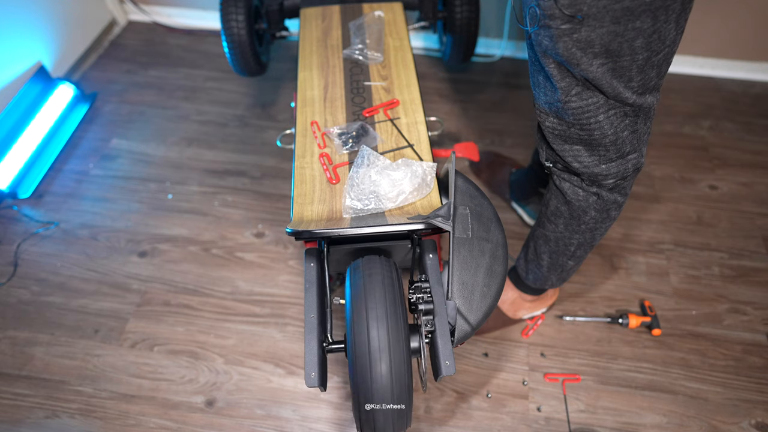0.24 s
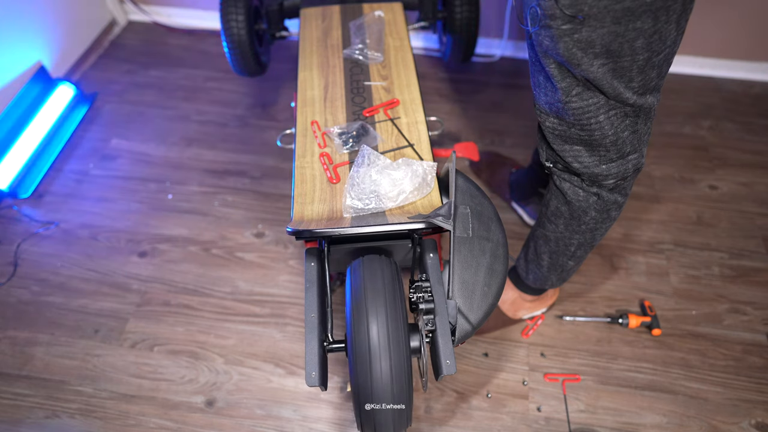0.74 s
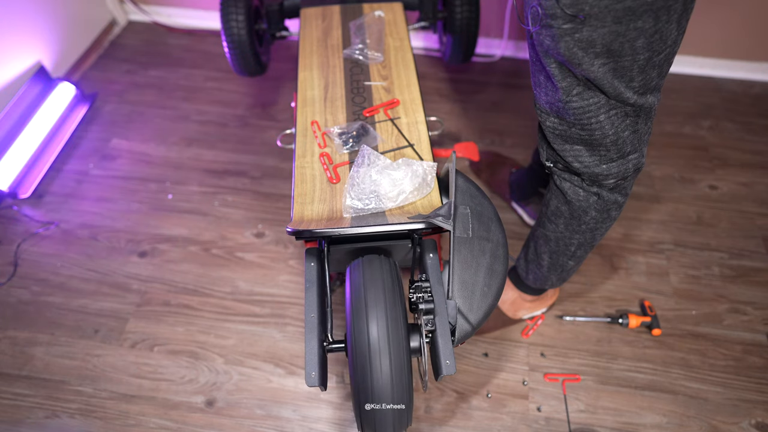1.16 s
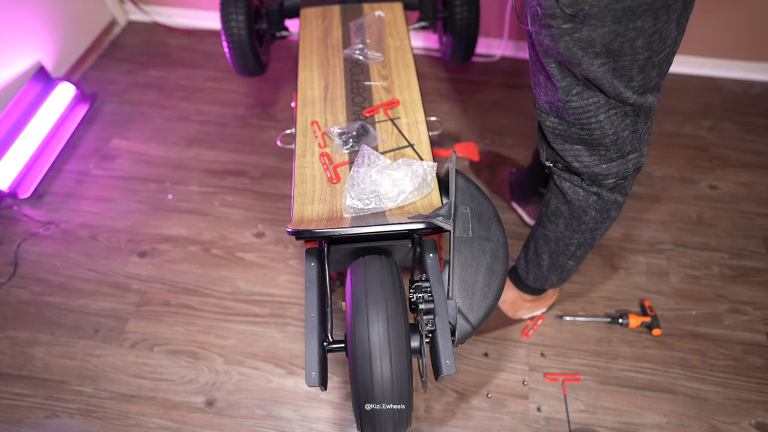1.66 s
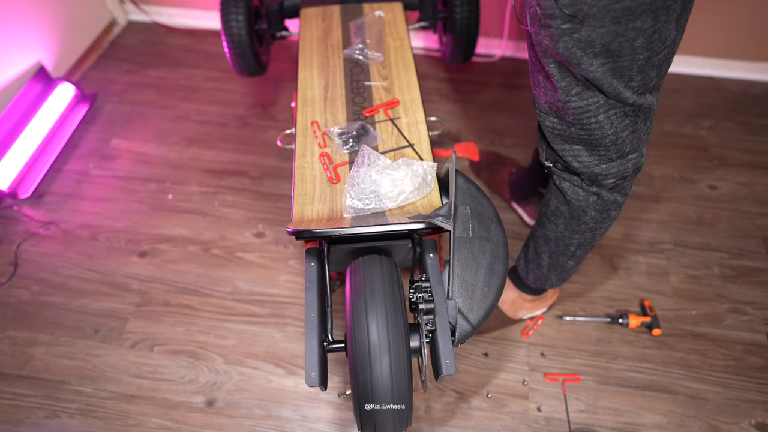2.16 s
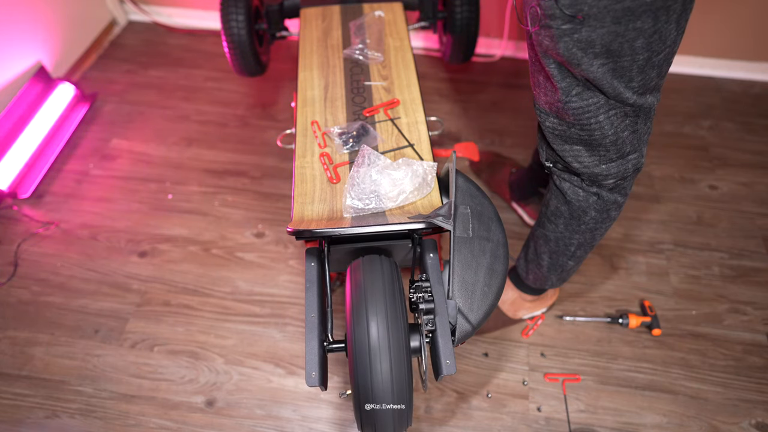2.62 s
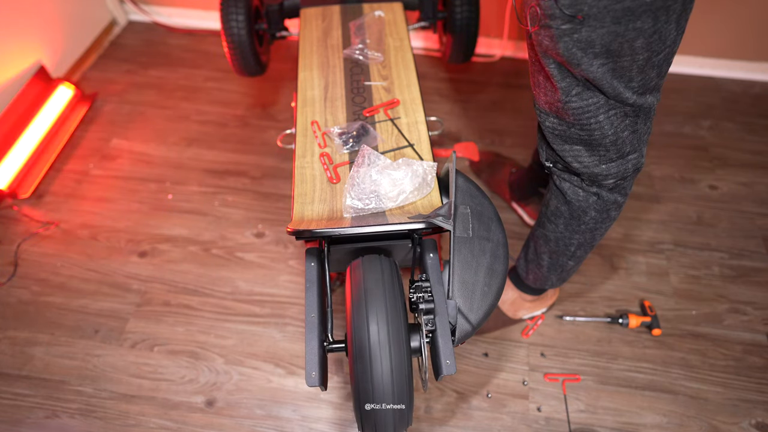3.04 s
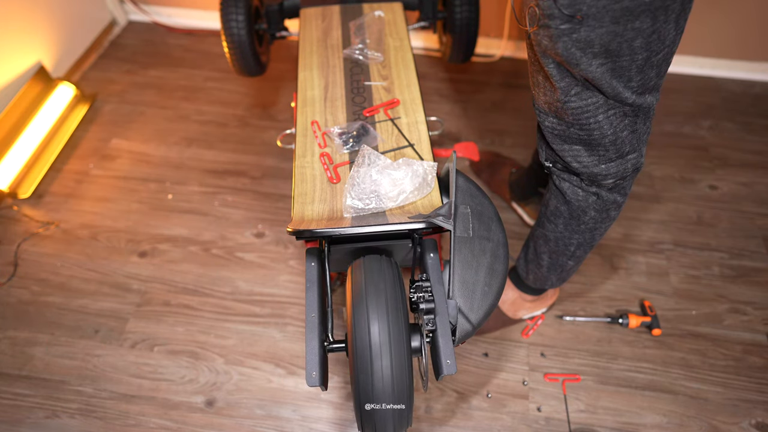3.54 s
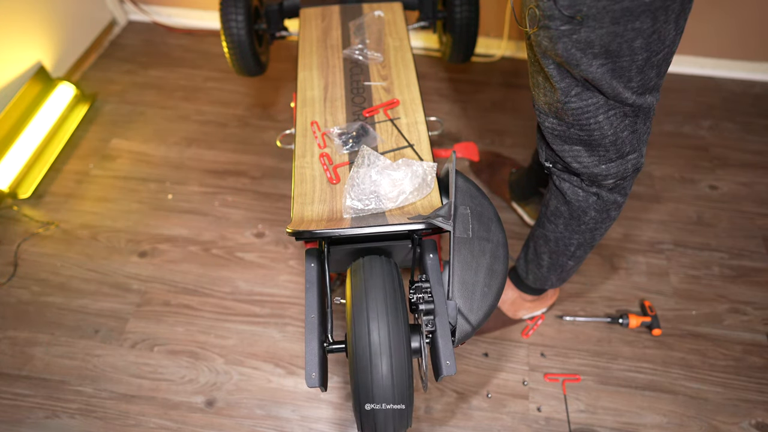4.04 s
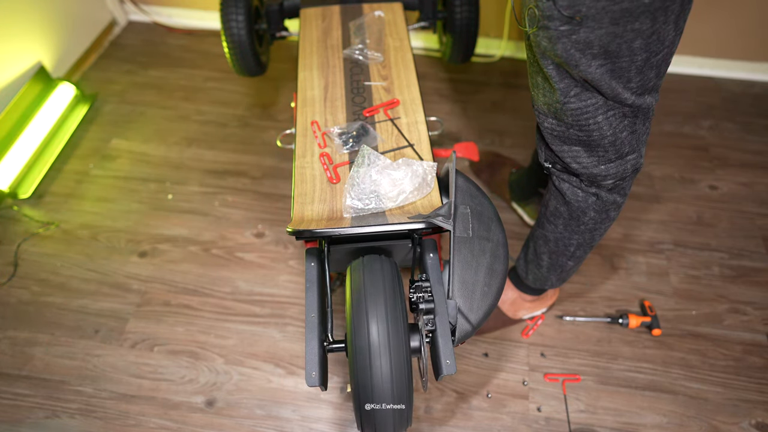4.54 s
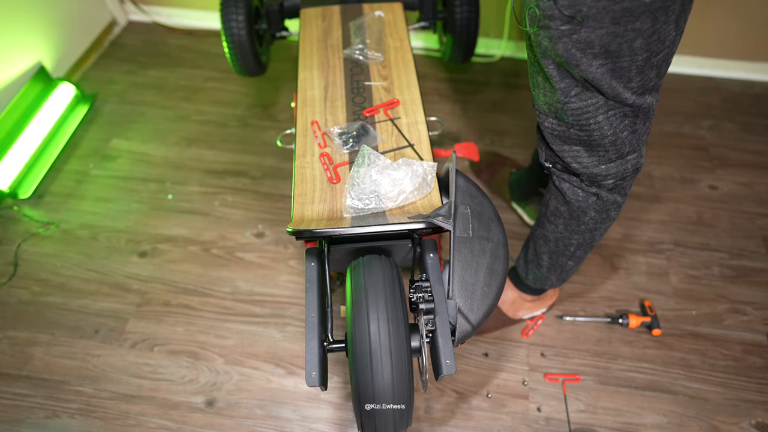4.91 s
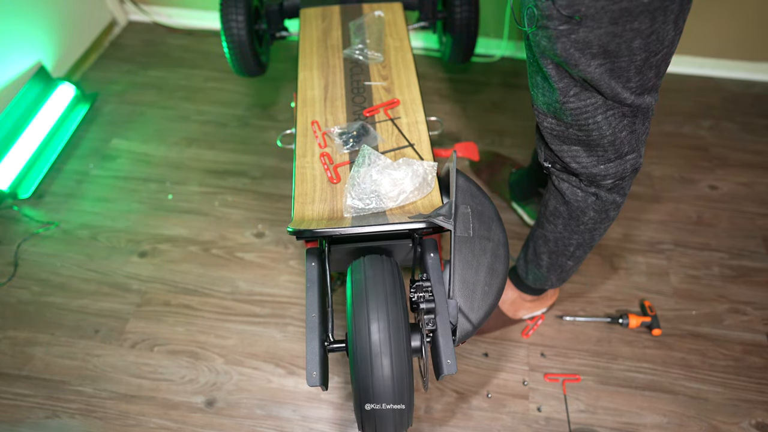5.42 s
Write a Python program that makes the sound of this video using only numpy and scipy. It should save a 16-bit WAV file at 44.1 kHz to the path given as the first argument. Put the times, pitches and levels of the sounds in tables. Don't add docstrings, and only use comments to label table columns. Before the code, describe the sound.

Close-up of a freewheeling scooter wheel droning loudly in a room, with brief gritty brake bites, lever knocks and recovering motor whine.

```python
import sys
import numpy as np
from scipy import signal
from scipy.fft import rfft, irfft, next_fast_len
from scipy.io import wavfile
from scipy.ndimage import uniform_filter1d

SR = 44100
rng = np.random.default_rng(int(sys.argv[2]) if len(sys.argv) > 2 else 0)


def convert_level_to_amplitude(level_db):
    exponent = np.asarray(level_db, float) / 20
    return 10 ** exponent


def digitize_waveform(pressure):
    field = np.atleast_2d(pressure).T
    bounded = np.clip(field, -1, 1)
    quanta = np.round(bounded * 32767).astype(np.int16)
    wavfile.write(sys.argv[1], SR, quanta)


N = 250488
TIME = np.arange(N) / SR
SIZE = next_fast_len(N + SR // 2)
FREQ = np.arange(SIZE // 2 + 1) * SR / SIZE + 1e-3

TURN_HZ, SWITCH_HZ = 14.88, 15745.5
BRAKE_PER_S, SPIN_UP_PER_S, CREEP = 3.9, 6.2, .03
CUT_S, LAG_S, WAKE_S = .035, 0.046, .035
PULL_DB, SURGE_DB, COAST_SLOPE = 1.7, 3, .9
WHIRR_DB, WHIRR_SLOPE = -1.23, .33
AIR_DB, AIR_SLOPE = -0.58, 0.18
SWELL_S, STRAIN_DB = .05, 1
BOOM_DB, BOOM_CUT_DB, BOOM_SLOPE = -15.5, -5.5, 0.15
GRIP_DB_PER_S, LET_GO_DB_PER_S = 1501, 203
RING_LEAD_S, RING_FADE_DB_PER_S = 0.018, 216

# brake on, brake off and throttle back, all in seconds.
STOPS = [
    (-.08, .1, .175),
    (3.63, 3.88, 3.958),
    (5.429, 5.69, 6.0),
]
# shaft order, line level in dB over the noise density at its pitch.
SHAFT_ORDERS = [(8, 11.0), (15, 14.0), (17, 15.0), (19, 17.0), (20, 13.0), (28, 22.0), (30, 25.0),
                (45, 21.0), (49, 14.0), (53, 14.0), (55, 11.0), (56, 11.0), (60, 24.0), (75, 20.0),
                (83, 13.0), (90, 13.0), (97, 18.0), (108, 12.0), (109, 23.0), (120, 16.0), (270, 19.0),
                (271, 17.0), (298, 18.0), (299, 17.0), (300, 20.0), (301, 14.0)]
# frequency in Hz,
# density in dB per Hz.
WHEEL_NOISE = [(175, -95), (215, -48.5), (245, -51), (285, -29), (325, -40), (345, -47), (385, -71.5), (430, -60),
               (480, -65), (565, -56), (650, -63.5), (740, -63.5), (800, -69.5), (990, -67.5),
               (1060, -69.5), (1270, -72), (1440, -70.5), (1550, -71), (1950, -73), (2300, -80.5), (3500, -83.5),
       (4500, -88), (6000, -90), (8500, -94.5), (9350, -99), (10400, -92), (12500, -97.5), (15700, -91.5)]
# frequency in Hz, width in Hz, level in dB over the
NOISE_PEAKS = [(750, 6.3, -14), (983, 10.4, -2.5), (1460, 14, 2), (1865, 20, 2.5), (2005, 7.8, 3),
               (2213, 26, 0.5), (2460, 19, 5), (3190, 14, -11), (5340, 15, -0.5), (6750, 12, -1), (7240, 32, 4),
               (7630, 39, 8), (8500, 32, 8.5), (8900, 25, 4.5), (10120, 23, 8), (11070, 17, -7), (11940, 30, 7),
               (12260, 50, 8), (12560, 30, 9), (13650, 25, 7), (14350, 40, 5)]
# centre in seconds, rise in dB over the rest level.
SWELLS = [(.26, 9), (.42, 5.5), (.54, 5), (0.661, 5.5), (.81, 5.5), (.99, 4.5), (1.121, 6), (1.3, 3),
          (1.68, 5), (2.05, 6), (2.15, 6), (2.3, 6), (2.548, 7.5), (2.74, 4.5), (2.89, 4.5), (3.261, 8),
          (3.49, 6.5), (3.6, 1.5), (4.06, 2), (4.17, 4.5), (4.28, 6), (4.42, -3.5), (4.541, 5), (4.75, 2.5),
          (4.87, 2.5), (5.0, 6.5), (5.19, 7), (5.299, 4.5), (5.39, 3), (5.52, 8.5), ]
# distance down in shaft orders, level in dB.
WHISTLES = [(111, -77), (105, -68), (99, -71), (90, -69), (60, -69), (58, -74), (55, -76), (54, -74),
            (30, -59), (24, -73), (7, -74), (6, -76), (3, -76), (0, -72)]
# start in seconds, hold in seconds, pad hiss in dB, disc ring in dB.
BITES = [
    (-.08, .08, -25, -26),
    (3.713, 0.06, -30.5, -34),
    (5.455, 0.082, -22, -28.5),
]
# frequency in Hz, density in dB per Hz.
PAD = [(300, -33), (600, 4), (1200, -7), (2200, -10.5), (2800, -13.5), (4500, -6), (6500, -5.5),
       (7700, -0.5), (8600, -4.5), (10400, -1.5), (12000, -8), (13700, -18), (15500, -35)]
# frequency in Hz, width in Hz, level in dB.
SQUEAL = [(3560, 24, -10), (6530, 34, -18), (7440, 26, -5.5), (8000, 36, -12), (8950, 73, -12),
          (10800, 36, -35)]
# frequency in Hz, width in Hz, level in dB.
DRAG = [(463, 26, 2), (574, 15, 4.5), (1005, 20, 5.5), (1067, 32, -4), (1308, 36, -7), (1660, 30, -6.5),
        (2187, 36, -10), (2470, 14, -13)]
# frequency in Hz, width in Hz, level in dB.
DISC = [(567, 28, -9), (1012, 38, 8.5), (1390, 43, 1.5), (1630, 38, -5), (1863, 33, -5.5), (2214, 70, -8.5),
        (3270, 50, -14), (3940, 54, -18.5)]
# start in seconds, then dull scrape, bright scrape, ring and thump in dB.
CLACKS = [
    (.004, -28, -45, -24, -26.5),
    (0.095, -25, -26, -24, -32),
    (.245, -23, -41, -39, -33),
    (.283, -21, -34.5, -37, -31),
    (3.653, -20, -44, -17.5, -26),
    (3.868, -28.5, -32.5, -31.5, -37),
    (3.954, -35, -43, -26, -37.5),
    (4.56, -20, -45, -48, -37),
    (5.423, -17, -38, -33.5, -40),
    (5.621, -44, -54, -46, -21.5),
]
# frequency in Hz, density in dB per Hz.
RUMBLE = [(20, -67), (27, -58.5), (35, -69), (60, -63.5), (80, -72), (90, -63.5), (100, -68), (108, -58.5),
          (125, -77), (148, -58), (175, -74), (200, -54.5)]
# frequency in Hz, left minus right in dB.
LEAN = [(60, 0.0), (110, -3.0), (200, -6.0), (380, -5.5), (700, -2.5), (1290, -0.5), (2380, -2.0),
        (4400, -1.0), (8120, -2.0), (15000, -1.5)]
# frequency in Hz, phase in radians by which the left leads.
LEAD = [(0, 0), (1120, 0.0), (1640, -0.4), (1890, -0.2), (4050, -0.1), (7240, -1.8), (7580, -1.4),
        (8180, -2.3), (10100, -3.5), (10900, -3.2), (14100, -5.0), (14500, -6.4), (14800, -10.4),
        (15300, -13.4)]
# frequency in Hz, share heard alike (1 same, 0 unrelated, negative opposed).
ALIKE = [(27, -0.34), (45, -0.072), (70, 0.26), (130, 0.79), (280, 1), (500, 0.93), (1000, 0.69),
         (2000, 0.7), (4000, 0.53), (8000, 0.42), (13000, 0.53)]
# start in seconds, end in seconds, lost above in Hz.
DROPOUTS = [(.09, .21, 15000), (3.745, 3.78, 14300), (3.83, 4.01, 14700), (3.86, 3.91, 13300),
            (5.465, 5.7, 14200), (5.5, 5.56, 12700), (5.6, 5.7, 12900)]


def wheel():
    speed, on, rising = motor()
    speed_db = 20 * np.log10(speed)
    pull_db = PULL_DB + SURGE_DB * rising + COAST_SLOPE * speed_db * (1 - on) * (1 - rising)
    whirr_db = WHIRR_DB + WHIRR_SLOPE * speed_db + STRAIN_DB * rising * on
    air_db = AIR_DB + AIR_SLOPE * speed_db
    turn = 2 * np.pi * np.cumsum(TURN_HZ * speed * (1 + .0002 * walk(3))) / SR

    body = convert_level_to_amplitude(along(WHEEL_NOISE))
    tones = rfft(shaft_orders(turn, speed, pull_db), SIZE) * body
    flutter = rfft(hiss(), SIZE) * body * (1 + abs(modes(NOISE_PEAKS)))

    throb = 0.15 * np.cos(turn + 1.7) + 0.11 * np.cos(6 * turn) + 0.11 * np.cos(15 * turn)
    whirr = band(tones, 405, 3920)
    whirr = whirr + band(flutter, 382, 3030) * (1 + throb) * convert_level_to_amplitude(0.4 * walk(9))
    air = band(tones, 3860, 9000)
    air = air + band(flutter, 3270, 9960) * convert_level_to_amplitude(1.1 * walk(3.85))
    air = air + band(flutter, 9600, 2e4) * (1 + 0.54 * throb)
    spin = frame_boom(tones + flutter, speed_db, on) + whirr * convert_level_to_amplitude(whirr_db) + air * convert_level_to_amplitude(air_db)
    return spin + controller_whistle(turn, pull_db)


def motor():
    lost, off, rising = np.zeros((3, N))
    for on_s, off_s, go_s in STOPS:
        braked = np.minimum(BRAKE_PER_S * (np.clip(TIME, on_s, off_s) - on_s), 1 - CREEP)
        gap = np.maximum(braked - SPIN_UP_PER_S * np.maximum(TIME - go_s, 0), 0)
        lost += gap
        dying = (TIME - on_s) / CUT_S
        waking = (go_s + LAG_S - TIME) / WAKE_S + 1
        off += np.clip(np.minimum(dying, waking), 0, 1)
        rising += (TIME > go_s) * np.minimum(10 * gap, 1)
    return 1 - lost, 1 - off, rising


def shaft_orders(turn, speed, pull_db):
    surge_db = np.clip(4 * SR * uniform_filter1d(np.gradient(speed), count(.03)), 0, 18)
    lines = np.zeros((2, N))
    for order, db in SHAFT_ORDERS + [(36, 14), (39, 11), (133, 13), (166, 13)]:
        if order == 90:
            load_db = surge_db
        else:
            load_db = np.minimum(pull_db, 9) * .4 * (order % 15 == 0)
        wander_db = (2.8 if order in (28, 30) else 1.2) * walk(6)
        trim_db = -.3 if order > 25 else -.8
        sway = convert_level_to_amplitude(db + load_db + wander_db + trim_db) * np.minimum(speed * 2, 1)
        lines += sway * tone_pair(order * turn + 2 * np.pi * rng.random())
    return lines


def frame_boom(shaking, speed_db, on):
    swell_db = sum(db * np.exp(-((TIME - s) / SWELL_S) ** 2) for s, db in SWELLS)
    boom_db = BOOM_DB + swell_db + (BOOM_CUT_DB + BOOM_SLOPE * speed_db) * (1 - on)
    boom = band(shaking, 177, 393)
    slow = uniform_filter1d(uniform_filter1d(boom[0] ** 2, count(.06)), count(.06))
    return unit(boom / slow ** 0.41) * convert_level_to_amplitude(boom_db)


def controller_whistle(turn, pull_db):
    whistle = np.zeros((2, N))
    for down, db in WHISTLES:
        phase = 2 * np.pi * (SWITCH_HZ * TIME + rng.random()) - down * turn
        whistle += convert_level_to_amplitude(db + 1.1 * walk(6)) * tone_pair(phase)
    direct_only = np.array([[1], [0]])
    return whistle * convert_level_to_amplitude(np.minimum(pull_db, 0) + 3) * direct_only


def brake():
    hiss_gain, ring_gain = np.zeros((2, N))
    for s, hold, hiss_db, ring_db in BITES:
        hiss_gain += convert_level_to_amplitude(hiss_db + grip_db(s, hold, LET_GO_DB_PER_S))
        ring_gain += convert_level_to_amplitude(ring_db + grip_db(s - RING_LEAD_S, hold + RING_LEAD_S, RING_FADE_DB_PER_S))
    grit = hiss() * convert_level_to_amplitude(0.37 * walk(120))
    pads = unit(colour(grit, convert_level_to_amplitude(along(PAD)))) + unit(colour(grit, modes(SQUEAL))) * convert_level_to_amplitude(-10)
    bowed_disc = unit(colour(hiss(), modes(DRAG)))
    return pads * hiss_gain * convert_level_to_amplitude(-1.5) + bowed_disc * ring_gain * convert_level_to_amplitude(4.0)


def grip_db(start, hold, fade):
    rise, fall = GRIP_DB_PER_S * (TIME - start), fade * (start + hold - TIME)
    return np.minimum(np.minimum(rise, fall), 0)


def clacks():
    pushes = np.zeros((4, N))
    for s, *db in CLACKS:
        age = np.maximum(TIME - s, 0)
        pushes += np.outer(convert_level_to_amplitude(np.array(db)), np.minimum(age / 0.0066, 1) * np.exp(-age / 0.014))
    dull, bright, ring, thump = pushes
    struck = 0.14 * sum(np.sin(2 * np.pi * (hz * TIME + rng.random((2, 1)))) for hz, *_ in DISC)
    struck = struck + .25 * rng.standard_normal((2, N))
    frame = modes([(147.98, 27, 0.5), (435, 60, 0.5), (583, 30, -8)])
    out = colour(dull * rng.standard_normal((2, N)), between(500, 2e4) / (1 + (FREQ / 3000) ** 4))
    out += colour(bright * rng.standard_normal((2, N)), between(4600, 8000))
    out += colour(ring * struck, 5.3 * modes(DISC))
    out += colour(thump * rng.standard_normal((2, N)), 13.0 * frame)
    return out


def room_rumble():
    return colour(hiss(), convert_level_to_amplitude(along(RUMBLE)) * between(12, 190))


def hiss():
    return rng.standard_normal((2, N)) * np.sqrt(SR / 2)


def tone_pair(phase):
    return np.sqrt(2) * np.sin(phase + np.array([[0], [np.pi / 2]]))


def walk(rate):
    k = count(1 / rate) if SR % rate == 0 else int(SR / rate)
    held = np.repeat(rng.standard_normal(N // k + 1), k)
    return 1.27 * uniform_filter1d(uniform_filter1d(held, k), k)[:N]


def modes(table):
    return sum(convert_level_to_amplitude(db) / (1 + 1j * (FREQ ** 2 - hz ** 2) / (FREQ * width)) for hz, width, db in table)


def along(table, hz=FREQ):
    table = np.array(table, float)
    return np.interp(np.log(hz), np.log(np.maximum(table[:, 0], 1)), table[:, 1])


def between(lo_hz, hi_hz):
    return 1 / np.sqrt((1 + (lo_hz / FREQ) ** 16) * (1 + (FREQ / hi_hz) ** 16))


def band(spectrum, lo_hz, hi_hz):
    return irfft(spectrum * between(lo_hz, hi_hz), SIZE)[:, :N]


def colour(x, gain):
    return irfft(rfft(x, SIZE) * gain, SIZE)[..., :N]


def unit(x):
    return x / np.sqrt(np.mean(x ** 2))


def count(seconds):
    return int(seconds * SR)


def scene():
    direct, scattered = rfft(wheel() + brake() + clacks() + room_rumble(), SIZE)
    lean_db, lead, alike = along(LEAN), along(LEAD), np.clip(along(ALIKE), -.9, 1)
    left = direct * convert_level_to_amplitude(lean_db / 2)
    right = alike * direct * np.exp(-1j * lead) + np.sqrt(1 - alike ** 2) * scattered
    right = right * convert_level_to_amplitude(-lean_db / 2)
    summed = .25 * (convert_level_to_amplitude(lean_db) + convert_level_to_amplitude(-lean_db) + 2 * alike * np.cos(lead))
    return irfft(np.array([left, right]) / np.sqrt(summed), SIZE)[:, :N]


def top_cut(x):
    return signal.sosfilt(signal.butter(12, 15790, fs=SR, output="sos"), x)


def record(dry):
    out = np.clip(dry, -1, 1)
    for start, stop, top_hz in DROPOUTS:
        gate = np.clip(np.minimum(TIME - start, stop - TIME) / .006, 0, 1)
        out = out - colour(out, FREQ > top_hz) * gate
    notch = colour(out, (FREQ > 9150) * (FREQ < 9600))
    out = out - notch * np.clip(2 * walk(24) + .6, 0, 1)
    return top_cut(out)


dry = scene()
out = record(dry)
digitize_waveform(out)
```